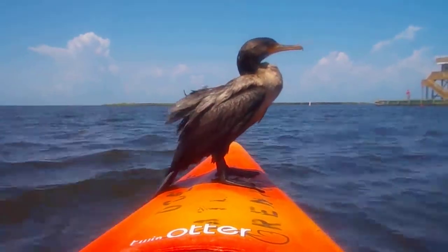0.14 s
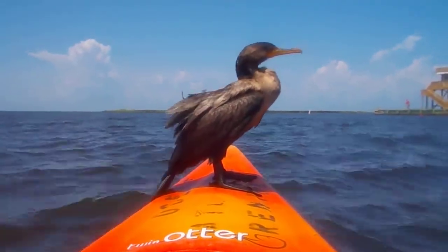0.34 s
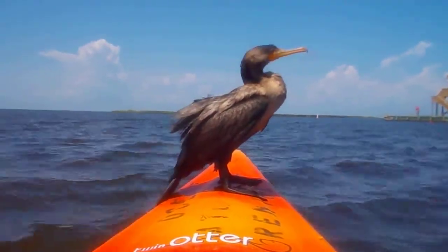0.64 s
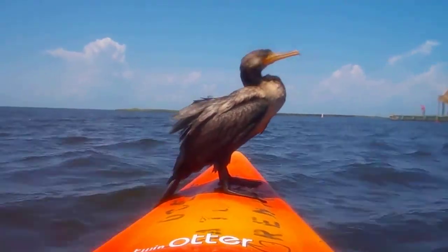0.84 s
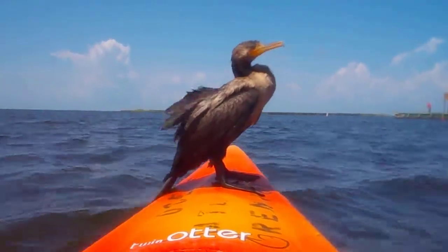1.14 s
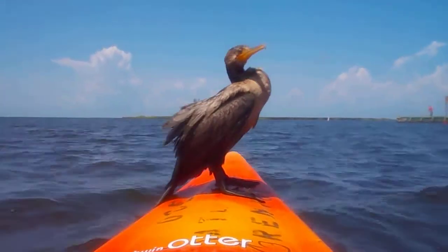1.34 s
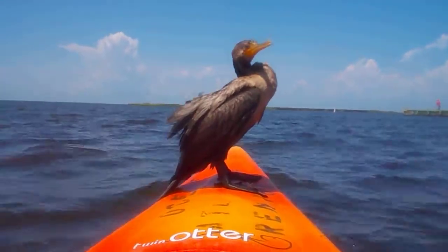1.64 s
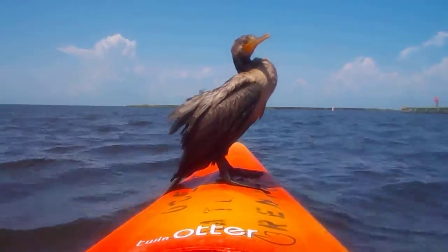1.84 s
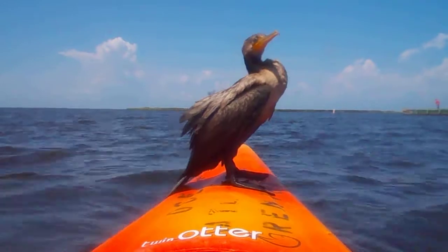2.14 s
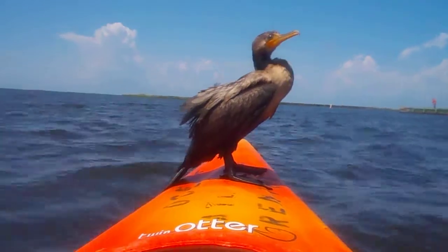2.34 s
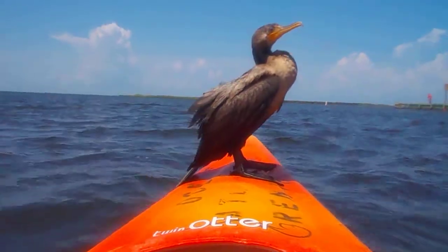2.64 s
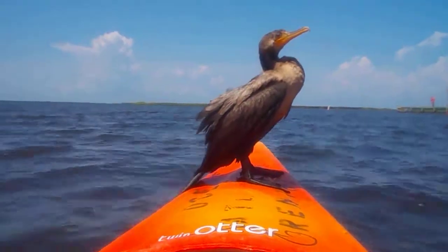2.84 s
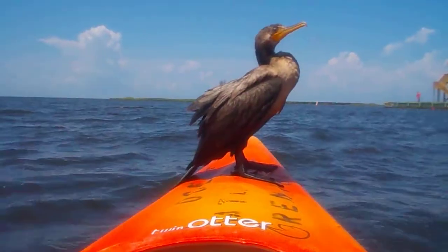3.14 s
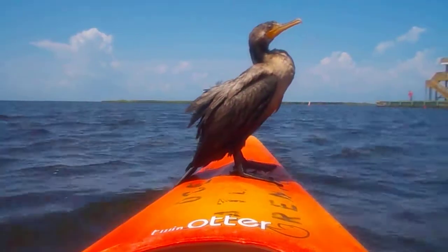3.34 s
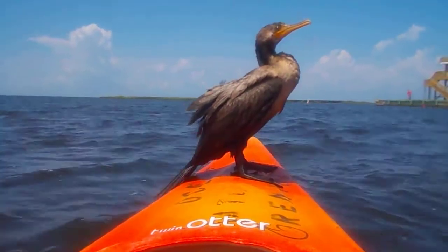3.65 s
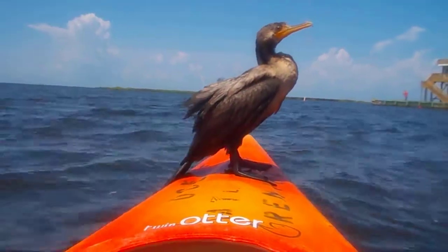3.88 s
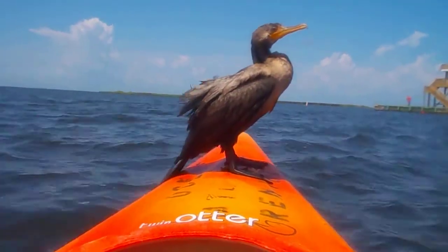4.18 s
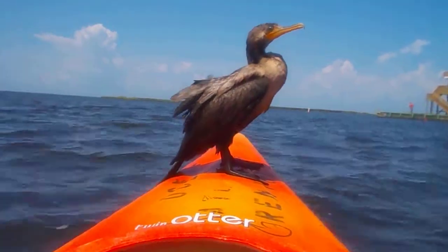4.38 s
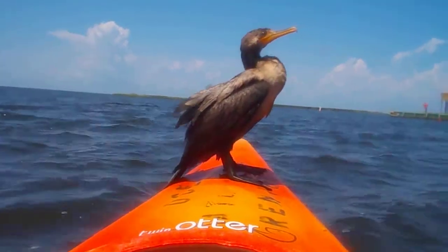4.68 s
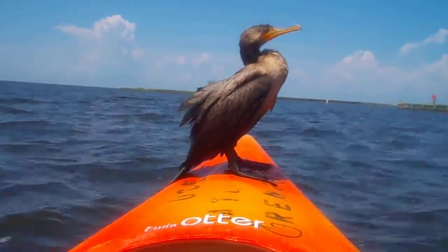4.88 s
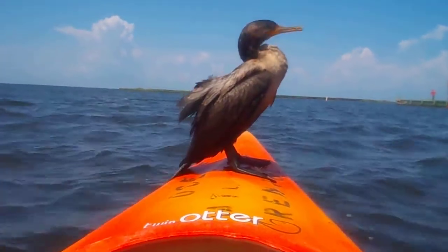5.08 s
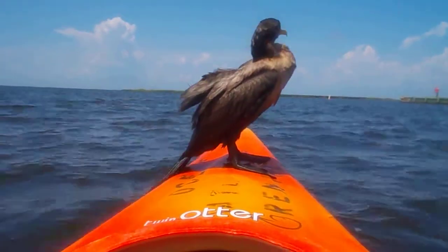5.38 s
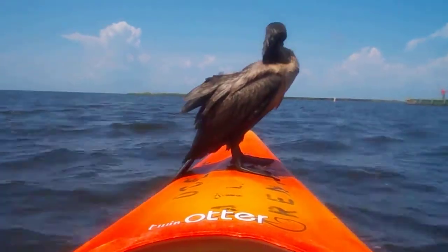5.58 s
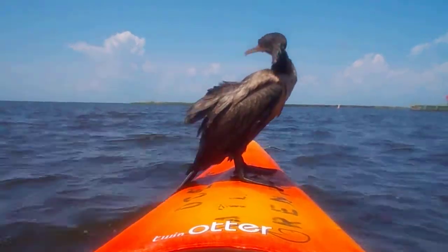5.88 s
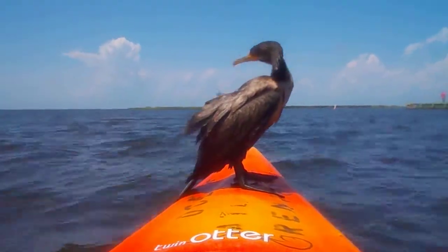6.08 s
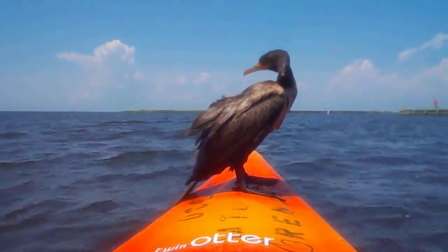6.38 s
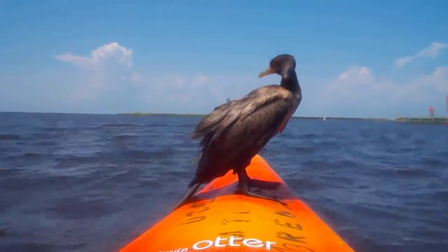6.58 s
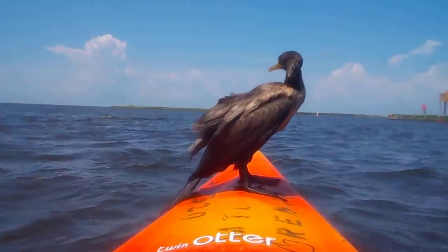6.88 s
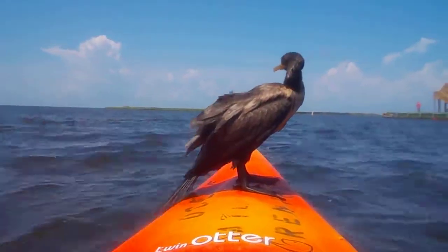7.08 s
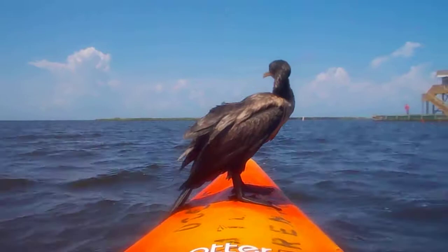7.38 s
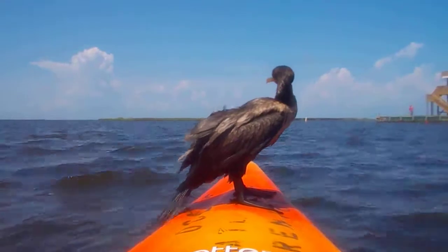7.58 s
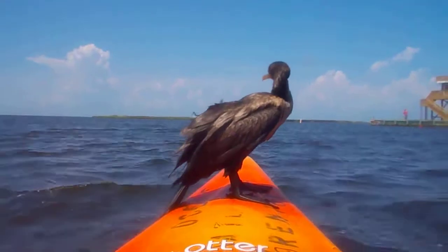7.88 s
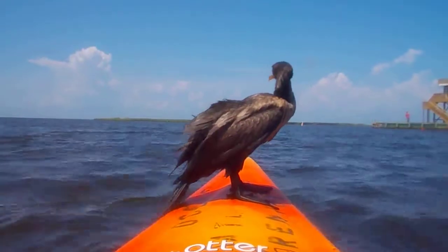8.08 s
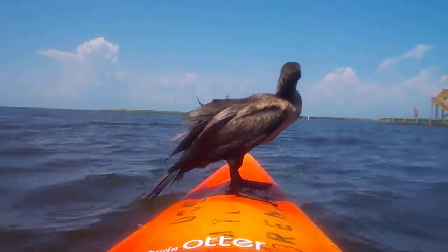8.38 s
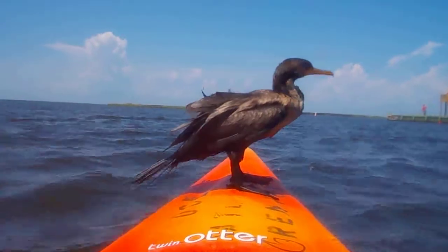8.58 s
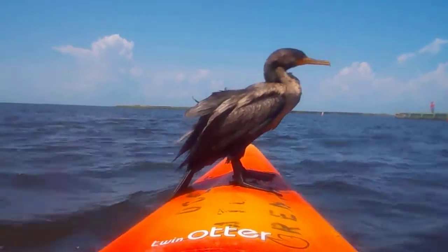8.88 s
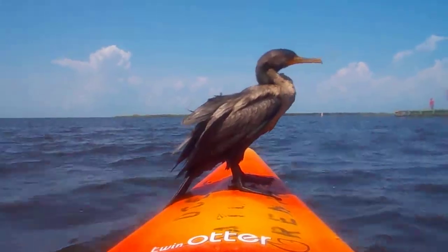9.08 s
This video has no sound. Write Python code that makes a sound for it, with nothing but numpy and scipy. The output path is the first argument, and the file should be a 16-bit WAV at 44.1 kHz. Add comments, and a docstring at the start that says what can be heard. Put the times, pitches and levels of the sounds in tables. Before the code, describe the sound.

Small waves slap and gurgle against a plastic kayak on open water, with uneven gusts popping on the microphone.

```python
"""Choppy water slaps a plastic kayak while wind buffets a small microphone. For the first two seconds,
swirls of air in the microphone's opening make clumps of loud, dull pops. Then the wind eases, leaving
more room for the water: tiny ringing bubbles that swell with each slap, a few thuds on the hull, loose
drops and some clear bubbles. Near 8 s the wind is strong again, and the hardest slap lands at 8.7 s.
All the while, far waves hiss and a camera whines faintly."""
import sys
import numpy as np
from scipy import signal
from scipy.fft import rfft, irfft, next_fast_len
from scipy.io import wavfile
from scipy.ndimage import uniform_filter1d

SR = 44100
rng = np.random.default_rng(int(sys.argv[2]) if len(sys.argv) > 2 else 0)


def persist_wave(psi):
    """Save psi, clipped to +-1, as 16-bit WAV."""
    counts = np.round(np.clip(psi, -1, 1) * 32767).astype(np.int16)
    wavfile.write(sys.argv[1], SR, np.atleast_2d(counts).T)


N = 407043

# The light wind between puffs: (time [s], level [dB])
BREEZE = [(0, -45.5), (.6, -37.5), (1.4, -31.5), (1.7, -48.5), (2.3, -38), (3.2, -61), (3.5, -68),
          (4.2, -65), (4.7, -50.5), (5.3, -56.5), (5.9, -60), (6.6, -60), (7.2, -42.5), (7.6, -59),
          (8.0, -40), (9.23, -37)]
# Short puffs of wind: (start [s], length [s], level [dB])
PUFFS = [(0.069, 0.018, -30), (0.2, 0.028, -33.5), (0.288, 0.039, -45), (0.368, 0.026, -30),
         (0.464, 0.13, -31.0), (0.63, 0.11, -29.5), (0.81, 0.032, -40), (0.883, 0.058, -44),
         (1.049, 0.18, -32), (1.292, 0.32, -24.5), (1.684, 0.049, -32), (1.811, 0.098, -34.5),
         (2.043, 0.11, -29), (2.213, 0.034, -43), (2.342, 0.013, -27.5), (2.414, 0.098, -40),
         (2.54, 0.16, -43.5), (2.752, 0.02, -47), (2.88, 0.044, -43), (3.042, 0.22, -40),
         (3.34, 0.03, -43.5), (3.394, 0.028, -42.5), (3.793, 0.17, -44.5), (4.248, 0.033, -51),
         (4.323, 0.19, -45), (4.535, 0.064, -41.5), (4.639, 0.053, -40.5), (4.717, 0.061, -35),
         (4.802, 0.056, -38), (4.936, 0.17, -38.0), (5.224, 0.03, -42), (5.262, 0.099, -45.5),
         (5.526, 0.035, -43), (5.63, 0.049, -48.5), (5.681, 0.028, -40.5), (6.194, 0.076, -52.5),
         (6.485, 0.049, -46.5), (6.562, 0.09, -52), (6.715, 0.037, -42), (6.789, 0.073, -37.5),
         (6.947, 0.032, -60), (7.07, 0.05, -44), (7.154, 0.019, -35.5), (7.27, 0.12, -44.5),
         (7.485, 0.034, -49), (7.562, 0.046, -36.5), (7.753, 0.13, -29), (7.99, 0.096, -30),
         (8.169, 0.072, -28), (8.288, 0.062, -24), (8.38, 0.024, -34.5), (8.514, 0.034, -38),
         (8.613, 0.072, -26.5), (8.696, 0.022, -43), (8.795, 0.045, -28.5), (8.846, 0.034, -27.5),
         (8.926, 0.21, -27.0)]
# Single dull pops of wind, plus higher thuds of water slapping the hull at 2.23, 2.90, 5.54 and 6.96 s:
# (time [s], peak level [dB], pitch [Hz])
POPS_AND_THUDS = [(0.0863, -21, 732), (0.1025, -7.5, 870), (0.285, -18, 555), (0.3768, -10.5, 640),
                  (0.5391, -12.5, 650), (0.5914, -10.5, 674), (0.616, -18, 630), (0.6355, -22, 720),
                  (0.651, -21, 770), (0.6843, -15.0, 550), (0.732, -9, 925), (0.8451, -14.5, 650),
                  (0.9216, -7.5, 710), (1.0873, -10.5, 605), (1.1416, -13, 620), (1.1741, -11, 650),
                  (1.1867, -11.5, 610), (1.2624, -10.5, 795), (1.338, -11, 665), (1.3466, -10.0, 685),
                  (1.3563, -8, 690), (1.3637, -7, 720), (1.3994, -13.5, 680), (1.4432, -13, 766),
                  (1.489, -25, 600), (1.515, -13.0, 730), (1.542, -12, 640), (1.5791, -4, 920),
                  (1.591, -12, 750), (1.8223, -20.5, 593), (1.8301, -16, 684), (1.8528, -24, 650),
                  (1.99, -12.5, 754), (2.0565, -14, 690), (2.0858, -18, 540), (2.1042, -12, 644),
                  (2.1289, -11.5, 920), (2.1378, -14.5, 740), (2.22, -13.5, 920), (2.2337, -12, 1160),
                  (2.2483, -24, 1110), (2.4397, -19, 600), (2.4915, -21, 670), (2.5982, -19.5, 850),
                  (2.6167, -24, 680), (2.9041, -9, 1140), (3.11, -21, 600), (3.2406, -28, 770),
                  (3.862, -27, 537), (3.9209, -20, 504), (4.3634, -20, 610), (4.5891, -16.5, 640),
                  (4.7288, -20, 690), (4.7523, -26, 830), (4.7606, -21, 590), (4.85, -21.5, 750),
                  (5.0103, -9.5, 560), (5.0385, -9.5, 630), (5.0812, -13.5, 630), (5.1006, -18.0, 744),
                  (5.269, -27, 890), (5.2773, -20, 694), (5.4048, -19.5, 640), (5.5387, -11, 1220),
                  (6.2385, -15.0, 640), (6.5058, -20.0, 490), (6.6467, -27, 780), (6.8233, -20.5, 670),
                  (6.9552, -16, 1010), (6.971, -32, 1050), (7.3096, -19.5, 600), (7.3216, -23, 605),
                  (7.3362, -13.5, 720), (7.581, -11.5, 790), (7.604, -22, 610), (7.7737, -12, 970),
                  (7.7846, -14, 580), (7.7909, -16, 650), (7.829, -14, 756), (7.8362, -15, 675),
                  (7.8709, -5, 770), (7.9158, -13.5, 884), (7.9947, -8.5, 800), (8.0374, -11, 595),
                  (8.0567, -10.5, 730), (8.1152, -11, 700), (8.2119, -4, 650), (8.231, -7.5, 900),
                  (8.2988, -16, 655), (8.3075, -18, 880), (8.3227, -5, 630), (8.3858, -14.5, 650),
                  (8.411, -14, 575), (8.6209, -12.5, 610), (8.6424, -4.5, 684), (8.669, -8.5, 635),
                  (8.715, -27, 860), (8.8032, -10, 610), (8.8609, -9.0, 615), (8.9657, -6, 720),
                  (8.9742, -3, 860), (9.062, -11, 620), (9.0739, -10.5, 804), (9.1288, -13, 650),
                  (9.1812, -14, 634)]


def wind_and_thuds(swirls_per_s=470, puff_fade_s=0.0069):
    """Swirls of air pop on the microphone in clumps, louder in the puffs; a few slaps thud on the hull."""
    clump_db = 6.2 * np.tanh(0.43 * wander(0.0069))
    hits = random_hits(swirls_per_s, spread_db=3.1, cap=3) * gain_of(clump_db)
    kind, out = rng.integers(0, 16, N), np.zeros(N)
    for k, (phase, sweep, lag) in enumerate(rng.random((16, 3))):
        hz = 700 * 2 ** (1.35 * (k / 15 - .5))
        pop = dull_pop(hz, 0.97, phase, 6.76 * (sweep - .5), 0.00767 * (lag - .5))
        out += signal.oaconvolve(hits * (kind == k), pop, "same")
    power = gain_of(2 * curve(BREEZE, column=1))  # doubling the dB gives power
    for start, length, db in PUFFS:
        t = np.arange(0, length, 1 / SR)
        fade = np.clip(np.minimum(t, length - t) / puff_fade_s, 0, 1)
        add(power, start, gain_of(2 * db) * fade)
    out = evened(out) * np.sqrt(power)
    for time, db, hz in POPS_AND_THUDS:
        phase, sweep, lag = rng.random(3)
        pop = dull_pop(hz, 1.11, phase, 6.5 * (sweep - .5), 0.00938 * (lag - .5))
        add(out, time - 512 / SR, gain_of(db) * pop)
    return out


# The basic tone of a middle-pitched pop: (frequency [Hz], relative level [dB])
POP_TONE = [(24, -78), (40, -46.5), (462, 0.5), (499, 2), (1020, -2.5), (1310, -19), (1470, -10.5),
            (2120, -29), (4000, -64), (5200, -68), (8800, -120)]
MIDDLE_POP_HZ = 650


def dull_pop(hz, narrowness, phase, sweep, lag_s):
    """One pop of wind or thud of water, with two weaker copies close beside it."""
    tone_hz = np.fft.rfftfreq(1024, 1 / SR) * MIDDLE_POP_HZ / hz
    strength = gain_of(level_at(POP_TONE, tone_hz) * 1.09 * narrowness)
    treble_shift = sweep * np.log(tone_hz / MIDDLE_POP_HZ + 0.27) ** 2  # highs come early or late
    pop = np.roll(irfft(strength * np.exp(1j * (2 * np.pi * phase + treble_shift))), 512)
    pop = pop - 0.22 * np.roll(pop, round(lag_s * SR)) + 0.35 * np.roll(pop, -round(1.713 * lag_s * SR))
    return pop * np.hanning(1024) / abs(signal.hilbert(pop)).max()


# Big bubbles gulp, middle ones froth, small ones spray, and lone ones plink:
# (lowest pitch [Hz], highest pitch [Hz], rate [per s], ring time [cycles], loudness spread [dB])
GULP, FROTH = (700, 2065, 950, 6.7, 3.95), (1930, 3854, 1600, 5.4, 3.58)
SPRAY = (4150, 10160, 4500, 7.4, 3.9)
PLINK = (900, 4200, 160, 7, 3.)
# The ever-present sloshing: (time [s], froth level [dB], spray level [dB])
SLOSH = [(0.0, -43.5, -56), (0.36, -50.5, -63.5), (0.79, -47.5, -59.5), (1.36, -56, -67),
         (1.8, -44.5, -56.5), (2.16, -49.5, -63.5), (2.7, -39, -51), (3.19, -42.5, -56.5),
         (3.32, -49, -58.5), (4.47, -50.5, -66.5), (4.88, -49.5, -58), (5.37, -58.5, -69.5),
         (6.01, -45, -61.5), (6.3, -53.5, -67.5), (6.84, -50.5, -68.5), (7.17, -46.5, -56.5),
         (7.4, -50.5, -66.5), (8.28, -54.5, -67), (8.43, -48, -55), (9.23, -39.5, -50)]
# Waves hitting the hull:
# (peak time [s], froth level [dB], gulp above froth [dB], spray above froth [dB], time to fall 8 dB [ms])
SLAPS = [(0.49, -33.5, -25, -23, 8.5), (0.71, -44.5, -5, -1, 24), (0.915, -32, -20, -21, 9),
         (0.965, -42, -15, -9, 74), (1.03, -37, -12, -8, 10), (1.534, -35, -1, -1.5, 3.6),
         (1.586, -32.5, 6, -5.5, 6), (1.607, -34, -8, -13, 25), (1.621, -23, 5, -15, 9.5),
         (2.087, -36.5, -1, -17, 5), (2.231, -31.5, 7.5, -19, 18), (2.249, -33.5, 4, -2.5, 4.7),
         (2.34, -34, -11, -9.5, 20), (2.564, -30, -8, -14, 28), (2.696, -30.5, -5, -8, 4.9),
         (2.767, -49.5, 13, -20, 5.5), (2.849, -39, -2, -32, 41), (2.906, -20.5, 4.5, -15, 7.3),
         (2.945, -48, -15, -12, 4), (3.23, -38.5, -17, -8, 8.7), (3.283, -35.5, -8, -22, 8.6),
         (3.336, -35.5, -9, -9, 10), (3.592, -37, -19, -9, 5.5), (3.769, -33.5, -12, -25, 3.4),
         (4.005, -34.5, -10, -13.5, 10), (4.377, -53.5, 5, 2.5, 14), (4.428, -36, -12.5, -26, 8.9),
         (4.659, -23.5, -6, -17, 20), (4.715, -42, -2, -6, 20), (4.738, -23, -7.5, -18.5, 6.2),
         (4.924, -40, -4, -9.5, 31), (4.977, -39, -1.5, -14, 26), (5.042, -38, -11, -30, 9.2),
         (5.101, -35, -4, -23, 3), (5.297, -39.5, -4, -13, 3.5), (5.522, -41, -1.5, -15, 40),
         (6.054, -44, -20, -12, 4.1), (6.683, -36.5, -28, -15, 5), (6.941, -27.5, -3.5, -14.5, 14),
         (6.966, -30.5, 1.5, -5.5, 8.4), (7.308, -42.5, 9, -4, 8), (7.323, -36, -14, -6, 2.7),
         (7.349, -38, -23, -14, 20), (7.566, -25.5, 1.5, -20.5, 3.8), (7.629, -26.5, -17, -17.5, 3.7),
         (7.821, -40, 8, -29, 4.9), (7.955, -38, -10, -31, 11), (8.28, -36, -20, -15, 20),
         (8.311, -27.5, 4, -14, 20), (8.333, -27, 0, -20, 5.2), (8.614, -37, -14, -6.5, 44),
         (8.637, -35.5, -23, -8, 45), (8.667, -34, -14, -9.5, 130), (8.709, -15, -4.5, -18.5, 7.6),
         (8.805, -24.5, 0, -31, 5), (8.825, -29, -8, -4.5, 9), (8.849, -44, -7, -2, 17),
         (9.11, -38, -13, -5.5, 100), (9.205, -38, -8, -3, 32)]
# How the microphone changes the water's tone: (frequency [Hz], boost or cut [dB])
MIC_TONE = [(300, -8), (900, 2), (1500, 2.5), (2050, -4.5), (3000, 4.5), (3650, -5), (5000, 3), (7200, -5),
            (10500, -7.5), (11500, -15), (12300, -9)]


def water():
    """Sloshing keeps three sizes of bubble ringing, and each slap on the hull makes them swell."""
    flicker = gain_of(1.45 * wander(0.01) + 0.19 * wander(0.022))
    froth = gain_of(curve(SLOSH, column=1)) * flicker
    spray = gain_of(curve(SLOSH, column=2)) * flicker
    gulp = froth * gain_of(-10.5)
    power = np.array([gulp, froth, spray]) ** 2
    ms = np.arange(-40, 160, 1000 / SR)
    for time, db, gulp_db, spray_db, fall_ms in SLAPS:
        rise_ms = 4 + 0.25 * min(fall_ms, 30)  # longer slaps build up more slowly
        crest = gain_of(-8 * np.where(ms < 0, abs(ms / rise_ms) ** 3, ms / fall_ms))
        trail = gain_of(-10 - 0.39 * ms) * (ms > 0)  # water runs back off the hull
        for row, extra_db in zip(power, (gulp_db, 0, spray_db)):
            add(row, time - .04, gain_of(2 * (db + extra_db)) * (crest ** 2 + trail ** 2))
    streams = [bubble_stream(*size) for size in (GULP, FROTH, SPRAY)]
    plinks = bubble_stream(*PLINK) * gain_of(curve(SLOSH, column=1) - 14)
    return coloured((np.sqrt(power) * streams).sum(0) + plinks, MIC_TONE)


def bubble_stream(low_hz, high_hz, per_s, ring_cycles, spread_db):
    """Many bubbles ring at random, each rising a little in pitch as it dies away."""
    hits = random_hits(per_s, spread_db, cap=5)
    kind, out = rng.integers(0, 16, N), np.zeros(N)
    for k, hz in enumerate(np.geomspace(low_hz, high_hz, 16)):
        cycles = np.arange(round(5 * ring_cycles * SR / hz)) * hz / SR
        glide = 1 + rng.uniform(0.001, 0.072) * cycles / (5 * ring_cycles)
        fade = np.exp(-cycles / ring_cycles) * (1 - np.exp(-cycles / .3))
        ring = np.sin(2 * np.pi * cycles * glide) * fade
        out += signal.oaconvolve(hits * (kind == k), ring / np.linalg.norm(ring))[:N]
    return evened(out)


# Bubbles you can pick out one by one, plus the bright ring of one slap at 8.273 s:
# (time [s], rough level [dB], starting pitch [Hz], length [ms])
CLEAR_RINGS = [(0.05, -30, 1670, 12), (0.728, -25.5, 1710, 14), (0.993, -39, 1890, 26),
               (1.217, -34, 2730, 17), (1.644, -27, 1830, 17), (1.72, -37, 4500, 11),
               (2.247, -24, 1810, 12.4), (2.576, -28, 1120, 15.5), (2.849, -24.5, 1825, 20),
               (2.9, -17.5, 1790, 11), (3.58, -43, 1116, 42), (3.83, -38.5, 1160, 30),
               (3.896, -30.5, 1800, 17), (3.984, -34, 1875, 19), (4.14, -38.5, 950, 14),
               (4.27, -39, 935, 30), (4.43, -32, 1950, 13), (5.535, -19.5, 1420, 12),
               (5.87, -34, 3120, 9.8), (6.163, -32.5, 944, 29), (6.314, -44.5, 1100, 23),
               (6.568, -38.5, 1270, 30), (6.575, -42, 563, 50), (6.955, -20, 847, 15.3),
               (7.465, -35, 960, 13.4), (7.563, -19, 1483, 15.6), (7.644, -33.5, 980, 18),
               (8.273, -40, 2750, 17), (8.689, -18, 1750, 10), (8.713, -12, 818, 12.4)]


def clear_rings(rise_hz_per_ms=6.6):
    """A bubble's note climbs near the surface and wobbles as it breaks up; one slap rings alike."""
    out, unsteady = np.zeros(N), wander(0.0022)
    for time, db, start_hz, ms in CLEAR_RINGS:
        progress = np.linspace(0, 1, round(ms * SR / 1000))
        wobble = 1 + .05 * unsteady[round(time * SR):][:len(progress)]
        hz = (start_hz + rise_hz_per_ms * ms * progress) * wobble
        fade = gain_of(db - 5.5 * progress) * signal.windows.tukey(len(progress), .3)
        add(out, time, fade * np.sin(2 * np.pi * np.cumsum(hz) / SR))
    return out * gain_of(4 * np.tanh(wander(.0012)))  # the loudness flutters


def droplets(per_s=60):
    """Single drops land with tiny ticks, louder when the water sloshes more."""
    hits = random_hits(per_s, spread_db=4.5, cap=4)
    kind, out = rng.integers(0, 10, N), np.zeros(N)
    for k, hz in enumerate(np.geomspace(2500, 9000, 10)):
        cycles = np.arange(200) * hz / SR
        tick = np.sin(2 * np.pi * cycles) * np.exp(-cycles / 10.3)
        out += signal.oaconvolve(hits * (kind == k), tick)[:N]
    return coloured(out * gain_of(curve(SLOSH, column=2) + 3), MIC_TONE)


# The tone of distant waves: (frequency [Hz], relative level [dB])
WAVE_TONE = [(18, -64), (30, -14), (442, -3.5), (849, 2.5), (2050, -2.5), (2980, -34), (4460, -12),
             (7190, -23), (11000, -23.5), (12200, -60), (15800, -81), (22000, -120)]


def far_waves(level_db=-59):
    """Waves far away blend into a soft, uneven hiss."""
    loudness = gain_of(level_db + 5.2 * wander(0.049))
    return loudness * evened(coloured(rng.standard_normal(N), WAVE_TONE))


# The camera's thin, high notes: (pitch [Hz], level [dB])
WHINE_NOTES = [(10740, -90), (10826, -109.5), (10907, -80), (11143, -90), (11230, -92), (11310, -89)]


def camera_whine():
    """The camera gives off a few faint, steady notes."""
    t = np.arange(N) / SR
    return sum(gain_of(db) * np.sqrt(2) * np.sin(2 * np.pi * (hz * t + rng.random()))
               for hz, db in WHINE_NOTES)


def gain_of(db):
    """Turns decibels into a number to multiply by."""
    return 10 ** (np.asarray(db) / 20)


def evened(x):
    """Scales a signal so its typical size (rms) is 1."""
    return x / np.sqrt(np.mean(x ** 2) + 1e-20)


def level_at(tone, hz):
    """Looks up a tone table's level at any frequency."""
    known_hz, db = np.transpose(tone)
    return np.interp(np.log(hz + 1), np.log(known_hz + 1), db)


def curve(rows, column):
    """Joins a column's values with straight lines over time."""
    rows = np.array(rows)
    return np.interp(np.arange(N) / SR, rows[:, 0], rows[:, column])


def coloured(x, tone):
    """Turns each frequency up or down as a tone table says."""
    size = next_fast_len(N)
    gains = gain_of(level_at(tone, np.fft.rfftfreq(size, 1 / SR)))
    return irfft(rfft(x, size) * gains, size)[:N]


def wander(seconds):
    """A smooth random drift; more seconds make it slower."""
    size = max(round(seconds * SR), 2)
    return evened(uniform_filter1d(uniform_filter1d(rng.standard_normal(N), size), size))


def random_hits(per_s, spread_db, cap):
    """Spikes at random times, most of them small and a few big."""
    sizes = gain_of(spread_db * np.minimum(rng.exponential(1, N), cap))
    return sizes * (rng.random(N) < per_s / SR)


def add(mix, start_s, sound):
    """Mixes a sound in at a given time."""
    part = mix[max(round(start_s * SR), 0):][:len(sound)]
    part += sound[:len(part)]


def scene():
    """Everything reaches one microphone."""
    return (wind_and_thuds() + water() + droplets() + clear_rings() + camera_whine() + far_waves())[None]


def record(dry, low_hz=70, high_hz=12300):
    """The microphone loses the deepest bass and the highest treble."""
    thin = signal.sosfilt(signal.butter(3, low_hz, "high", fs=SR, output="sos"), dry)
    treble_cut = signal.firwin(511, high_hz, window=("kaiser", 9), fs=SR)
    return signal.oaconvolve(thin, treble_cut[None], "same")


dry = scene()
out = record(dry)
persist_wave(out)
```